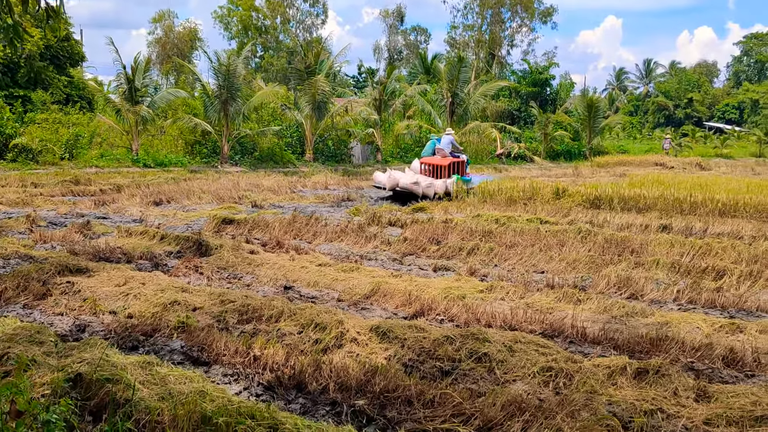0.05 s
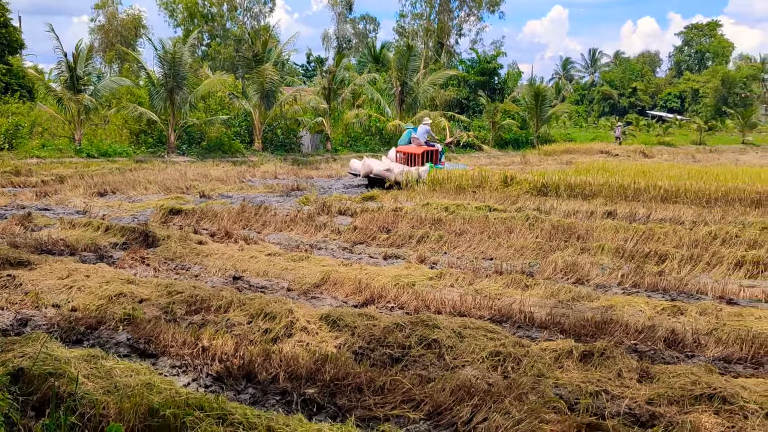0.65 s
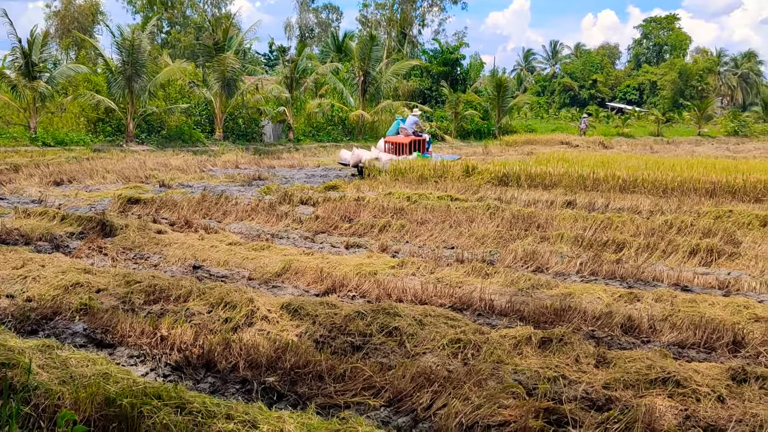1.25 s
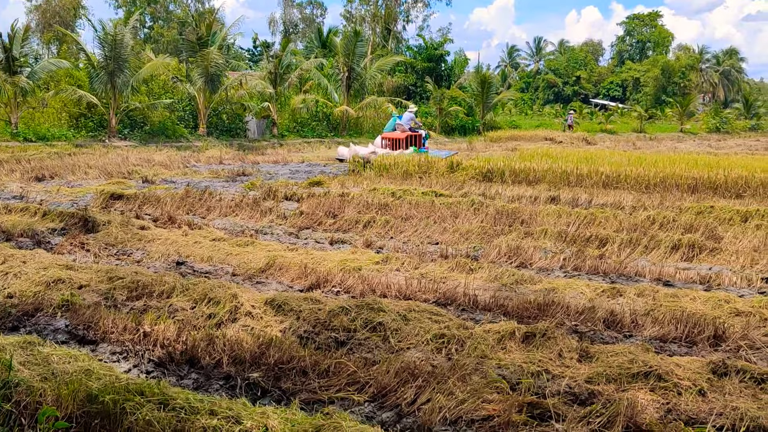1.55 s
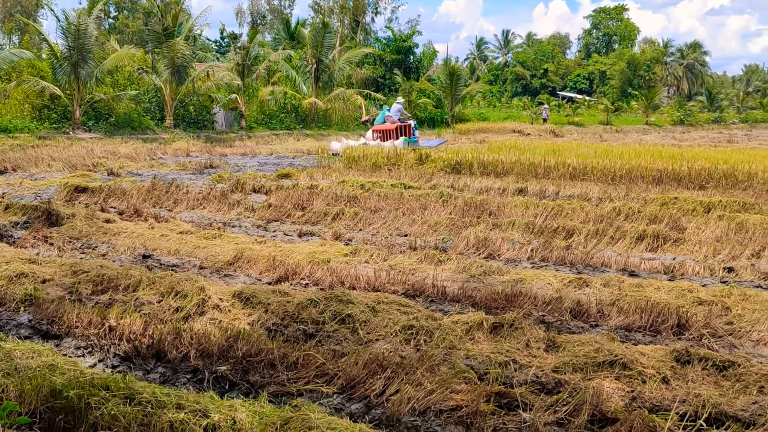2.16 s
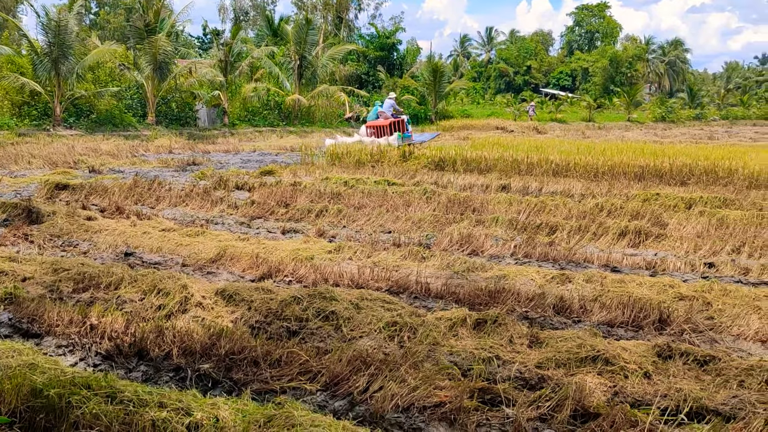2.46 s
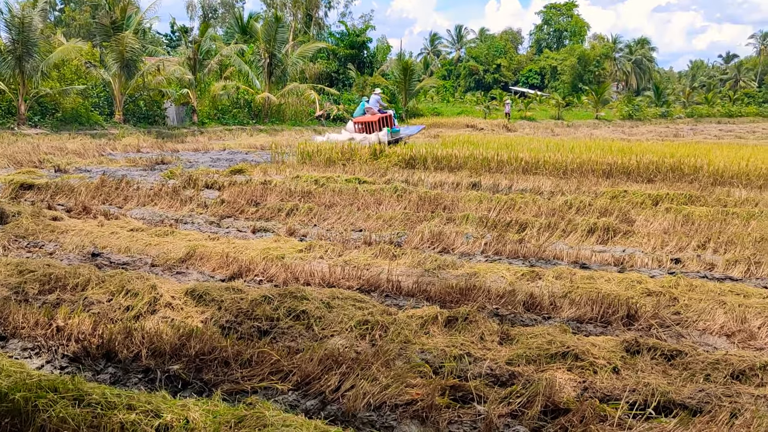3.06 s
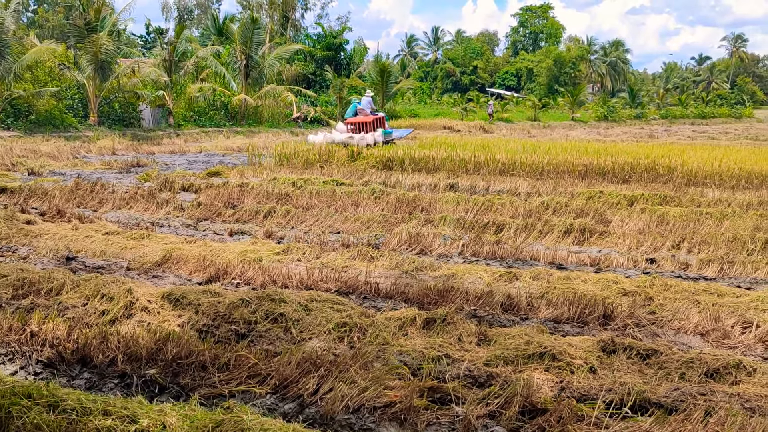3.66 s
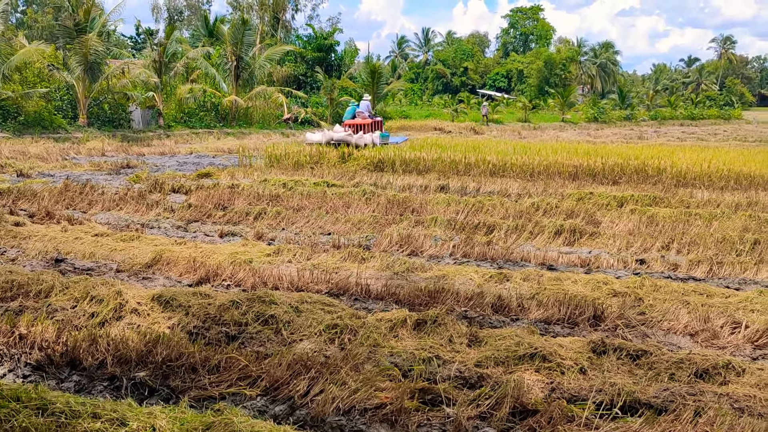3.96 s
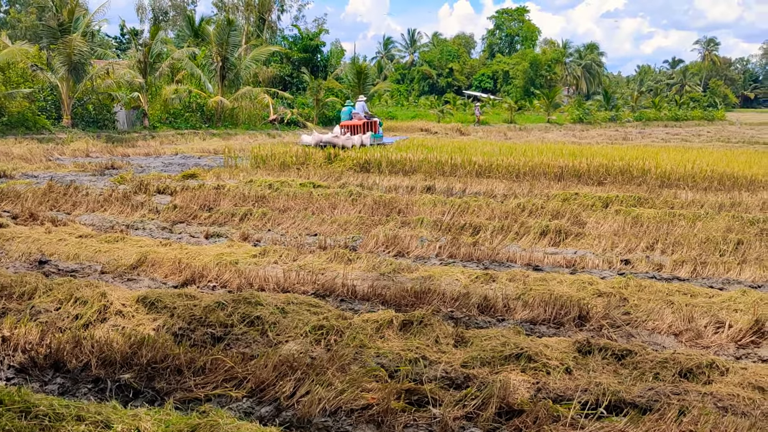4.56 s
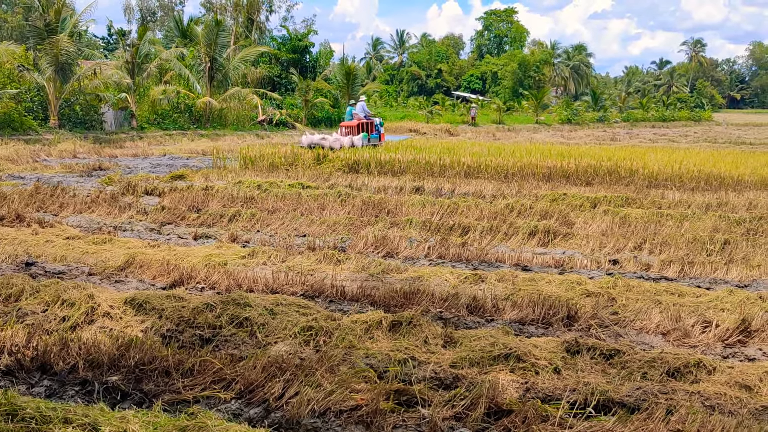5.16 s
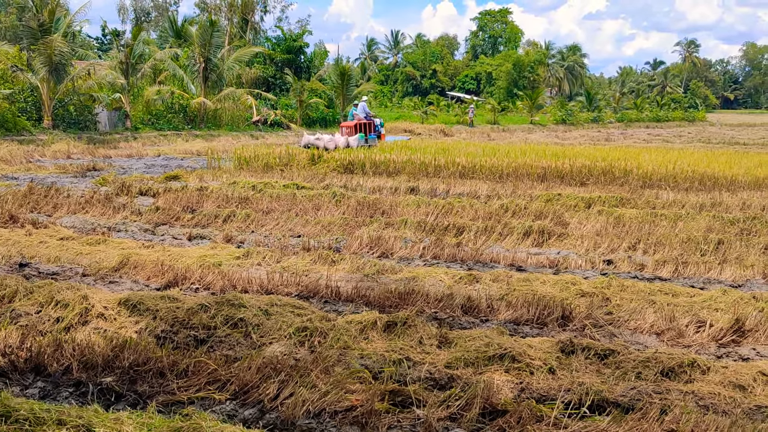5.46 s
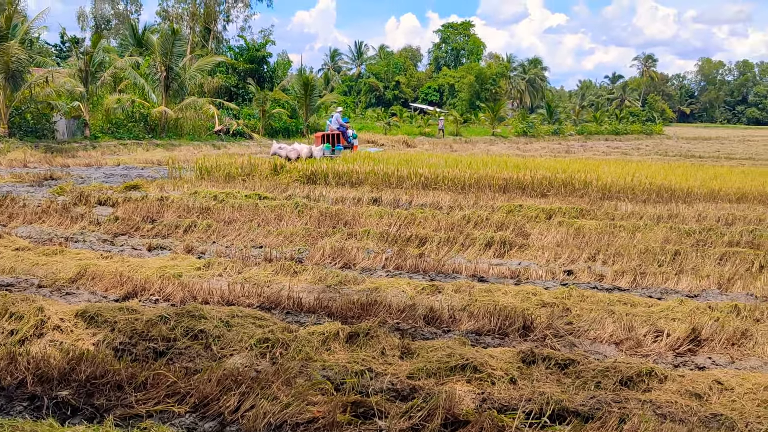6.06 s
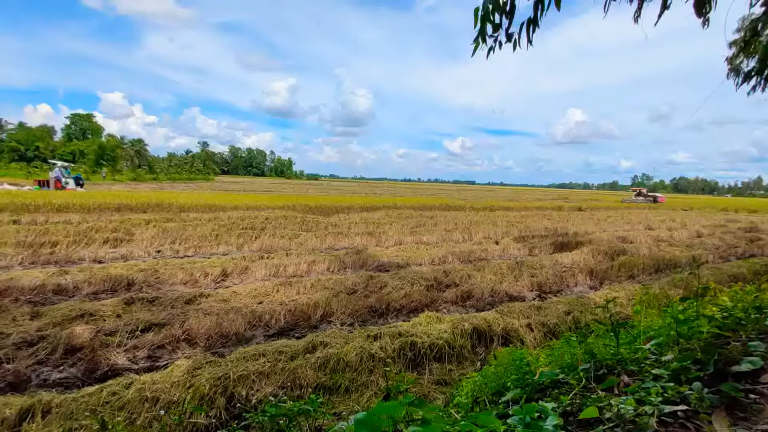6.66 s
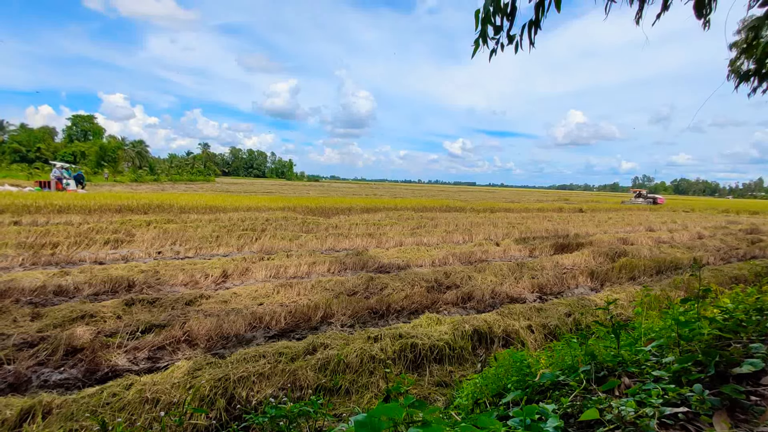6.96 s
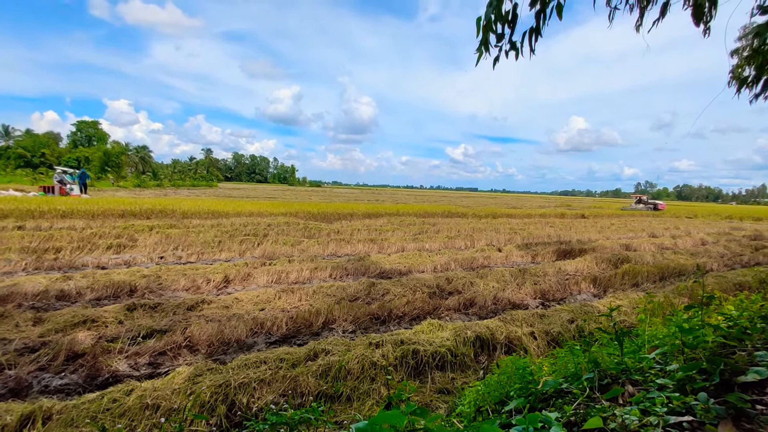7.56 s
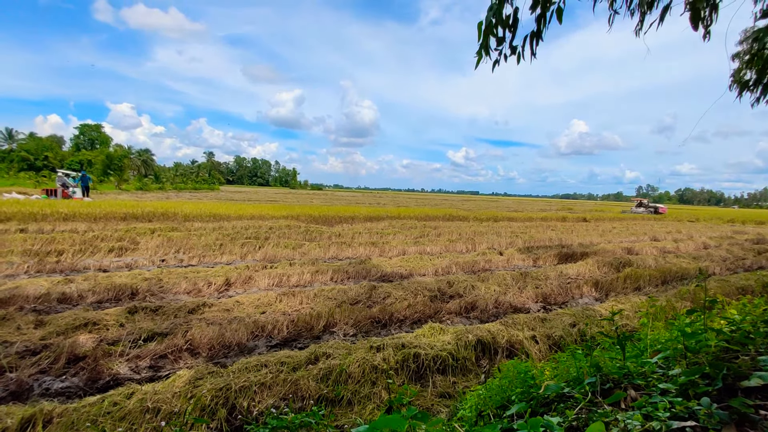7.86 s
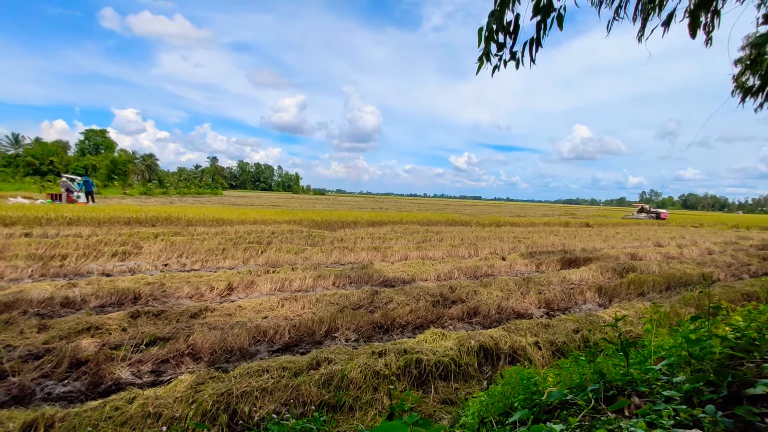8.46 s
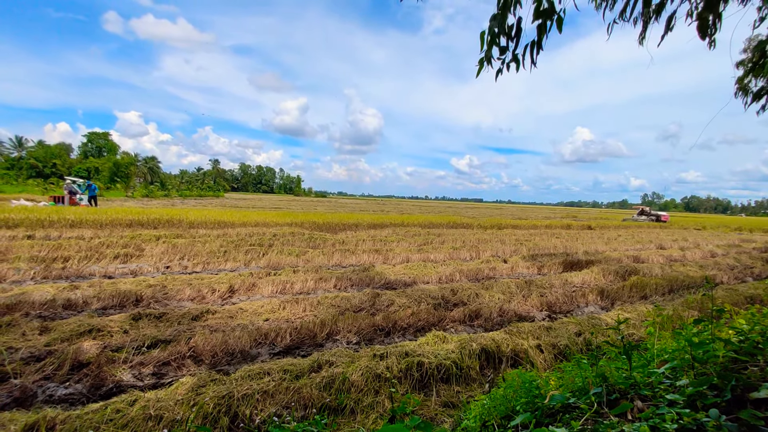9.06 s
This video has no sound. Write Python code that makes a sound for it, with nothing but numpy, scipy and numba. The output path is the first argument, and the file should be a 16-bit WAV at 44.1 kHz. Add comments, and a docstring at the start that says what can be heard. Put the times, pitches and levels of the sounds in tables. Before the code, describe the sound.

A small harvester engine runs hard near a stereo microphone in an open field, its exhaust rasping and barking above a low rumble and rushing threshing machinery. It rises slightly in pitch, then bogs down gradually, with a few harder cracks. About two thirds through, it is suddenly replaced by the softer drone of distant harvesters, with light fluttering clatter and a thin whine that swells and fades.

```python
"""A muddy rice field, on a two-port stereo microphone. First, close by, a small three-cylinder harvester
labours through the crop: every firing barks and rasps out of its open exhaust, over the rush of the
threshing gear. From about 2 s the engine sags in speed as crop and mud load it. At 6.4 s the scene
changes at once to harvesters far across the field: a low drone with wavering machine whines."""
import sys
import numpy as np
from scipy import signal
from scipy.fft import rfft, irfft, next_fast_len
from scipy.io import wavfile
from numba import njit

SR = 44100
rng = np.random.default_rng(int(sys.argv[2]) if len(sys.argv) > 2 else 0)


def dump_mix(stems):
    """Bounce the given channels to the path in sys.argv[1] as a 16-bit WAV at rate SR."""
    frames = np.atleast_2d(stems).T  # one column per channel
    limited = np.clip(frames, -1, 1)  # hard clip at full scale
    pcm = np.round(limited * 32767).astype(np.int16)
    wavfile.write(sys.argv[1], SR, pcm)


N = 410571
TIME = np.arange(N) / SR
DIRECT = np.array([[1], [0], [0]])  # of the three paths to the microphone, the direct one only
SIDES = np.array([[.5], [-.5]])  # splits a left-right difference between the ports

# the three cylinders in firing order: bark/dB, rasp/dB
CYLINDERS = [(1.6, -2.14), (-3, -4.1), (-4.5, -4.7)]
# the close machine at the two ports: f/Hz, likeness/0-1, left lead/rad, left minus right/dB
NEAR_IMAGE = [(100, .93, .3, 0), (270, .88, .15, -.7), (500, .83, .3, 0), (900, .82, .7, .5),
              (1400, .72, 1.6, 2), (2100, .45, 1.3, 6), (2800, .6, -.8, 6.5), (4000, .74, .3, .8),
              (6000, .62, .8, -2), (8000, .5, 1.65, -1), (12000, .42, 2.15, 1.1)]
# the machines across the field at the two ports: same columns
FAR_IMAGE = [(100, .99, -.08, .3), (280, .97, -.3, .3), (650, .78, -.55, 0), (900, .5, -.9, .5),
             (1220, .92, -2.1, 5), (1700, .9, -2.4, -3), (2500, .65, -5.6, 0), (3500, .55, -7.2, -1),
             (6000, .45, -12.8, -3), (12000, .4, -26, -2)]


def from_db(db):
    """Decibels to gain."""
    return 10 ** (np.asarray(db) / 20)


def rms_one(x):
    """Scale to unit power."""
    return x / np.sqrt(np.mean(x ** 2) + 1e-20)


def in_time(rows):
    """The columns of a curve at every sample."""
    times, *columns = np.transpose(rows)
    return [np.interp(TIME, times, column) for column in columns]


def noise():
    """White noise for the three paths."""
    return rng.standard_normal((3, N))


def drift(hz, hop=40):
    """Slow random wander of spread 1."""
    r = np.exp(-2 * np.pi * hop * hz / SR)
    slow = signal.lfilter([1], [1, -2 * r, r * r], rng.standard_normal(N // hop + 2002))[2000:]
    return np.interp(np.arange(N) / hop, np.arange(len(slow)), rms_one(slow))


def resonate(x, hz, width):
    """One resonance with gain 1 at its peak."""
    r = np.exp(-np.pi * width / SR)
    poles = [1, -2 * r * np.cos(2 * np.pi * hz / SR), r * r]
    return signal.lfilter(np.array([1, 0, -1]) * (1 - r * r) / 2, poles, x + 1e-18)


@njit
def moving_resonance(x, hz, width):
    """A resonance with gain 1 at its peak, whose centre can move."""
    out = np.zeros_like(x)
    r = np.exp(-np.pi * width / SR)
    for i in range(2, x.shape[1]):
        feedback = 2 * r * np.cos(2 * np.pi * hz[i] / SR)
        for c in range(x.shape[0]):
            drive = (1 - r * r) / 2 * (x[c, i] - x[c, i - 2])
            out[c, i] = drive + feedback * out[c, i - 1] - r * r * out[c, i - 2]
    return out


def lift_band(x, hz, width_hz, boost):
    """Lift the band around hz, keeping the total power."""
    lifted = x + boost * moving_resonance(x, hz, float(width_hz))
    return lifted * np.std(x) / np.std(lifted)


def at_ports(paths, image, colour=None):
    """One direct and two scattered paths reach the microphone; given a colour, at unit power."""
    size = 2 * next_fast_len(N // 2 + 4096)
    log_hz = np.log(np.arange(size // 2 + 1) * SR / size + 1)
    hz, *columns = np.transpose(image)
    alike, lead, balance_db = [np.interp(log_hz, np.log(hz), column) for column in columns]
    spectra = rfft(paths, size)
    direct = np.sqrt(alike) * np.exp(1j * lead * SIDES) * spectra[0]
    scattered = np.sqrt(1 - alike) * spectra[1:]
    mid_power = np.maximum((1 + alike * np.cos(lead)) / 2, .3)
    pair = (direct + scattered) * from_db(balance_db * SIDES) / np.sqrt(mid_power)
    if colour is None:
        return irfft(pair, size)[:, :N]
    hz, level_db = np.transpose(colour)
    cepstrum = irfft(np.log(from_db(np.interp(log_hz, np.log(hz), level_db))))
    causal_filter = np.exp(rfft(2 * cepstrum[:size // 2], size))
    out = irfft(pair * causal_filter, size)[:, :N]
    return out / np.std(out.mean(axis=0))


def far_drone():
    """Across the field, distance smears the firings into a drone, with fluttering clatter and hiss."""
    # colours of the three layers: f/Hz, relative level/dB
    drone_colour = [(18, -54), (30, -36), (59, -13), (63, -21), (75, -5), (134, -3), (156, -2), (189, -2),
                    (268, -10), (375, -31.5), (400, -53), (520, -60), (880, -120)]
    clatter_colour = [(220, -55), (380, -27), (430, -16), (560, -9.5), (690, -13), (800, -11), (980, -15.5),
                      (1200, -13), (1540, -16.5), (1670, -12), (2010, -13.5), (2700, -13), (3700, -16),
                      (4500, -20), (5850, -60), (9900, -110)]
    hiss_colour = [(2470, 1), (4200, -7), (4960, 0), (6030, 1), (6480, -4), (6930, -2.5), (8010, -5),
                   (10400, -14.5), (13400, -13), (15100, -17), (15900, -28)]
    # their course: t/s, drone/dB, clatter/dB, hiss/dB
    levels = [(6.42, -26.5, -36.5, -45.5), (7.5, -28, -36.5, -45), (8.5, -28, -37, -46),
              (9.31, -29, -37, -46.5)]
    drone_db, clatter_db, hiss_db = in_time(levels)
    drone = from_db(drone_db) * at_ports(noise(), FAR_IMAGE, drone_colour)
    clatter = from_db(clatter_db - .5 + drift(50)) * at_ports(noise(), FAR_IMAGE, clatter_colour)
    hiss = from_db(hiss_db + .8 + 1.1 * drift(40)) * at_ports(noise(), FAR_IMAGE, hiss_colour)
    return drone + clatter + hiss


def far_whines(flutter_db=1.5, partner_ratio=1.4, partner_db=-11):
    """A distant whine, its higher partner and fainter tones waver in the moving air."""
    # the main whine: t/s, f/Hz, level/dB
    main_whine = [(6.4, 1240, -48), (6.92, 1240, -52), (7.08, 1231, -39.5), (7.8, 1227, -39.5),
                  (8.3, 1224, -45), (9.31, 1220, -37.5)]
    # narrow bands of noise: f/Hz, nominal width/Hz, level/dB
    faint_tones = [(91, 7.2, -39), (130.1, 3.9, -37.5), (734, 2.8, -50.5), (786, 20, -53.5),
                   (1095, 11, -47), (1155, 46, -48.5), (1310, 22, -56), (1386, 11, -49), (1712, 29, -49),
                   (2355, 38, -49), (2546, 50, -47), (3018, 55, -44), (5940, 200, -53)]
    whine_hz, whine_db = in_time(main_whine)
    phase = 2 * np.pi * np.cumsum(whine_hz + 4.52 * drift(12)) / SR
    whine_gain = np.sqrt(2) * from_db(whine_db + flutter_db * drift(4.3))
    whine = whine_gain * np.cos([phase, phase + 3 * drift(3.5), phase + 3 * drift(8.3)])
    partner_gain = np.sqrt(2) * from_db(whine_db + partner_db + flutter_db * drift(6))
    partner = partner_gain * np.cos(partner_ratio * phase + 1.7 * drift(15))
    white, tones = noise(), 0
    for hz, width, db in faint_tones:
        band = resonate(resonate(white, hz, 1.9 * width), hz, 1.9 * width)
        tones += from_db(db + drift(20)) * rms_one(band)
    return at_ports(whine + partner + tones, FAR_IMAGE)


def thresher_and_rumble(rumble_db):
    """The threshing gear rushes steadily over a low rumble of machinery."""
    # their colours: f/Hz, relative level/dB
    rush_colour = [(220, -51), (380, -12.5), (451, 0), (579, -5), (646, -0.5), (804, -1), (1250, -3.5),
                   (1600, -6.5), (1730, -3), (2120, -5.5), (3600, -5), (5320, -13), (6940, -20.5),
                   (14200, -37.5), (15900, -61)]
    rumble_colour = [(25, -14), (50, -24), (85, -2.5), (140, 3), (220, -1.5), (305, -8.5), (375, -23),
                     (600, -43.5)]
    rush = from_db(-29.5 + .85 * drift(11)) * at_ports(noise(), NEAR_IMAGE, rush_colour)
    return rush + from_db(rumble_db) * at_ports(noise(), NEAR_IMAGE, rumble_colour)


def gear_whine(turns, multiple=16):
    """A gear locked to the crankshaft whines at a multiple of the firing rate."""
    # the whine's course: t/s, level/dB
    levels = [(0, -37), (.7, -33), (1.5, -32), (1.9, -27), (2.35, -33.5), (2.55, -45), (3.6, -43),
              (6.36, -52)]
    gear_db, = in_time(levels)
    gain = np.sqrt(2) * from_db(gear_db + 1.3 * drift(12))
    return gain * np.cos(2 * np.pi * multiple * turns + 1.22 * drift(16.7))


def engine_lope(turns, lope_db):
    """Unequal cylinders add tones between the multiples of the firing rate."""
    # those tones: multiple of the cycle rate, relative level/dB
    tones = [(2, -15), (4, -3), (5, 0), (8, -3)]
    phase = 2 * np.pi * turns / len(CYLINDERS)
    return np.sqrt(2) * sum(from_db(lope_db + db + .91 * drift(7.7)) * np.cos(k * phase) for k, db in tones)


def exhaust_note(turns, rate, crest_turns=.072, wobble_db=-.4):
    """Low harmonics crest together just after the valve opens; each swells near a muffler resonance."""
    # the exhaust pulse: harmonic, relative level/dB
    pulse = [(1, -2.5), (2, 0), (3, -0.5), (4, -15), (5, -13.5), (6, -19)]
    # the muffler's resonances: f/Hz, half width/Hz, level/dB
    muffler = [(51.3, 8, -34), (68, 8.2, -29.5), (99.4, 5.5, -16), (109.5, 7.7, -11.5), (136, 10.8, -18.5),
               (145.5, 3.3, -35), (171.8, 3.8, -25.5), (205.2, 13.5, -16), (228.4, 4.9, -8),
               (274.6, 13, -17), (294, 13, -21.5), (328.5, 18, -26.5)]
    # one harmonic dips briefly: t/s, half length/s, harmonic, dip/dB
    dips = [(1.99, .13, 2, -28), (2.34, .12, 2, -15), (1.745, 0.49, 3, -7.5), (3, 0.038, 3, -3),
            (1.6, .35, 5, -12), (5.43, 0.35, 5, -16)]
    note = 0
    for k, pulse_db in pulse:
        power = sum((from_db(db) / (1 + ((k * rate - hz) / width) ** 2)) ** 2 for hz, width, db in muffler)
        dip_db = sum(db * np.exp(-((TIME - t) / span) ** 2) for t, span, which, db in dips if which == k)
        gain = np.sqrt(2 * power) * from_db(pulse_db + dip_db + wobble_db * drift(12))
        note += gain * np.cos(2 * np.pi * k * (turns - crest_turns))
    return note


def pipe_boom(turns, rate, width_hz=56):
    """Harmonics 6 to 10 swell as they pass through the pipe's resonance; unit power."""
    # the resonance rises as the gas runs hotter: firing rate/Hz, f/Hz
    resonance = [(50, 426), (55, 453), (68, 490)]
    pipe_hz = np.interp(rate, *np.transpose(resonance))
    harmonics = np.arange(6, 11)[:, None]
    gains = 1 / (1 + ((harmonics * rate - pipe_hz) / width_hz) ** 2)
    boom = np.sum(gains * np.cos(2 * np.pi * harmonics * turns), axis=0)
    return boom / np.sqrt(np.sum(gains ** 2, axis=0) / 2)


def ringing(strikes, firing, modes, spread_db, wander_db, flip_share=.3):
    """Each firing strikes each mode with its own strength; modes fade in and out as the machine rocks."""
    strike_db = spread_db * np.clip(rng.standard_normal((firing[-1] + 1, len(modes))), -2, 1.5)
    signs = np.where(rng.random(strike_db.shape) < flip_share, -1, 1) * (-1) ** np.arange(len(modes))
    strength = signs * from_db(strike_db)
    ring = 0
    for k, (hz, width, db) in enumerate(modes):
        drive = strikes * strength[firing, k] * from_db(wander_db * drift(3.2))
        ring += from_db(db) * rms_one(resonate(drive, hz, width))
    return ring


def guard_clang(strikes, firing):
    """The firings set the sheet-metal guards ringing, loudest at the start."""
    # the guards' modes: f/Hz, width/Hz, relative level/dB
    modes = [(1145, 64, -14.5), (1325, 21, -7.5), (1394, 10.6, -5.5)]
    # the clang's course: t/s, level/dB
    levels = [(0, -28.5), (1.25, -32.5), (1.8, -39), (3.4, -32.5), (4.4, -39), (5.7, -53)]
    clang_db, = in_time(levels)
    return from_db(clang_db) * ringing(strikes, firing, modes, spread_db=1, wander_db=-1.5)


def puffs(age, rise_s, decay_s, tail, tail_s):
    """Turbulent gas: each puff opens fast and dies away, followed by a weaker scattered tail."""
    power = np.exp(-2 * age / decay_s) + tail ** 2 * np.exp(-2 * age / tail_s)
    return noise() * (1 - np.exp(-age / rise_s)) * np.sqrt(power)


def jet_pitch(firing, spread=.13):
    """Each jet of gas sings briefly at a pitch of its own: one random ratio a firing."""
    return np.exp(spread * rng.standard_normal(firing[-1] + 1))[firing]


def exhaust_sizzle(clicks, firing, age, gain):
    """The shortest puffs hiss at the top of the range, and the stack's highest modes ring."""
    # the hiss: f/Hz, relative level/dB
    colour = [(2880, -26), (4900, -6), (5250, -3), (5820, -1), (6420, -4), (7820, -7.5), (8550, -14),
              (10800, -21), (15100, -24), (15900, -22)]
    # the stack's highest modes: f/Hz, width/Hz, relative level/dB
    modes = [(5150, 80, -22), (5710, 36, -10), (5860, 270, -17.5), (7530, 110, -26)]
    jet = gain ** 1.12 * puffs(age, rise_s=.00045, decay_s=.0014, tail=.28, tail_s=.014)
    sizzle = from_db(-2.5) * at_ports(jet, NEAR_IMAGE, colour)
    sizzle = lift_band(sizzle, 5900 * jet_pitch(firing), width_hz=260, boost=1.3)
    return sizzle + ringing(clicks * gain, firing, modes, spread_db=4, wander_db=4)


def exhaust_rasp(clicks, firing, age, gain, rate, edge_share=.23):
    """A sharp edge and a jet of gas rasp out of the ringing stack, higher at higher engine speed."""
    # the jet: f/Hz, relative level/dB
    colour = [(880, -36.5), (1500, -1.5), (1660, -15), (1840, -2.5), (2230, -11), (2630, -8.5), (2860, 2.5),
              (3320, 0.5), (3690, 2.5), (4090, 2), (4360, 0), (4690, 2.5), (5200, -5.5), (6760, -44),
              (11400, -120)]
    # the stack's modes: f/Hz, width/Hz, relative level/dB
    modes = [(1880, 29, -24), (2440, 22, -20), (2812, 17, -17.5), (3100, 40, -43), (3400, 28, -27),
             (3660, 23, -17), (4030, 42, -14.5), (4260, 44, -18), (4540, 82, -20)]
    jet = rms_one(gain * puffs(age, rise_s=.00018, decay_s=.0028, tail=.35, tail_s=.015))
    edge = edge_share * DIRECT * rms_one(clicks * gain)
    rasp = from_db(-2) * at_ports(jet + edge, NEAR_IMAGE, colour)
    centre_hz = 3670 + 37 * (rate - 60)
    rasp = lift_band(rasp, centre_hz * jet_pitch(firing), width_hz=240, boost=1.3)
    return rasp + ringing(clicks * gain, firing, modes, spread_db=5.5, wander_db=4)


def exhaust_bark(clicks, age, gain, step_share=1.37, centre_hz=834.0):
    """A pressure step and a puff leave the pipe; the step repeats each firing, so the bark is pitched."""
    # the bark: f/Hz, relative level/dB
    colour = [(340, -44.5), (580, -16), (715, -0.5), (829, 0), (995, -1.5), (1080, 0), (1170, -11),
              (1250, 0.5), (1620, -26.5), (2750, -120)]
    step = step_share * DIRECT * rms_one(clicks * gain)
    gas = rms_one(gain * puffs(age, rise_s=.0003, decay_s=.0068, tail=.45, tail_s=.013))
    bark = at_ports(step + gas, NEAR_IMAGE, colour)
    return lift_band(bark, np.full(N, centre_hz), width_hz=88, boost=.37)


def firing_force(firing, uneven_db=1.0):
    """Strength of every firing in dB: a little chance, and runs of harder firings."""
    # one cylinder fires harder: t/s, cycles running, level/dB
    cracks = [(.222, 1, 1), (.564, 1, 0.5), (1.405, 1, 0.5), (2.372, 1, 1), (2.795, 1, 3.5), (2.863, 5, 2),
              (3.280, 4, 1), (3.636, 1, 3), (3.708, 3, 2.5), (4.249, 1, 5), (4.394, 1, 5), (4.687, 3, 1),
              (5.243, 1, 1)]
    force_db = uneven_db * rng.standard_normal(firing[-1] + 1)
    for t, cycles, db in cracks:
        first = firing[int((t + .005) * SR)]
        force_db[first + len(CYLINDERS) * np.arange(cycles)] = db
    return force_db


def above_rush(level_db, rush_db):
    """Gain of a blast that sinks away as it nears the level of the machine's rush."""
    return from_db(level_db) * np.sqrt(np.clip(1 - from_db(2 * (rush_db - level_db)), .1, 1))


def exhaust_blasts(turns, rate, turn_away_s=1):
    """Every firing barks, rasps, sizzles and booms through the open pipe and shakes the guards."""
    # strength of the blasts: t/s, rasp/dB, bark/dB
    levels = [(0, -19.5, -29), (0.55, -19, -27.5), (1.0, -19, -25.5), (1.8, -21, -25), (2.3, -21.5, -27),
              (2.6, -25.5, -29), (2.85, -22.5, -27), (3.2, -24, -28.5), (3.85, -26, -31.5),
              (4.2, -30, -35.0), (4.5, -25, -31), (5.15, -25.5, -29), (5.4, -29, -31.5),
              (5.65, -37.5, -36.2), (6.36, -34.5, -34)]
    rasp_db, bark_db = in_time(levels)
    effort_db = rasp_db + 25  # against a middling blast
    # boom and sizzle follow the rasp, and fall off as the machine turns from the microphone
    facing = np.exp(-(TIME / turn_away_s) ** 2)
    boom_db = -42 + .8 * effort_db + 5.5 * facing
    sizzle_db = -33.5 + .94 * effort_db + 6.5 * facing
    firing = turns.astype(int)
    age = turns % 1 / rate  # seconds since the last firing
    clicks = np.diff(firing, prepend=0).astype(float)
    cylinder_db = np.array(CYLINDERS)[firing % len(CYLINDERS)].T
    bark_gain, rasp_gain = from_db(cylinder_db + firing_force(firing)[firing])
    bark = from_db(-1.34) * above_rush(bark_db, rush_db=-35) * exhaust_bark(clicks, age, bark_gain)
    clang = guard_clang(clicks * bark_gain, firing)
    rasp = above_rush(rasp_db, rush_db=-37) * exhaust_rasp(clicks, firing, age, rasp_gain, rate)
    sizzle = above_rush(sizzle_db, rush_db=-42.5) * exhaust_sizzle(clicks, firing, age, rasp_gain)
    boom = from_db(boom_db + 1.3 * drift(15)) * pipe_boom(turns, rate)
    return bark + clang + rasp + sizzle + boom


def near_harvester():
    """The machine close to the microphone: one engine speed drives its exhaust and gear whine."""
    # the engine sags under crop and mud: t/s, firing rate/Hz
    speed = [(0.0, 66.61), (0.76, 68.21), (1.19, 69.58), (1.72, 69.59), (2.25, 66.67), (2.46, 63.59),
             (2.73, 59.23), (2.88, 57.95), (3.38, 56.89), (3.74, 54.63), (3.99, 56.0), (4.81, 53.93),
             (5.14, 53.82), (5.42, 53.18), (5.82, 49.53), (6.36, 49.39)]
    # the low end: t/s, lope/dB, rumble/dB, left minus right of the note/dB
    low_end = [(0, -33, -27, 0), (1.2, -29.5, -25.5, -0.6), (2.2, -33, -27.5, 0.3), (3, -38, -25, -0.7),
               (5, -36, -29, -1.3), (6.36, -41, -26.5, -1.3)]
    rate, = in_time(speed)
    turns = np.cumsum(rate) / SR + .145  # one turn of phase a firing
    lope_db, rumble_db, pan_db = in_time(low_end)
    note = (engine_lope(turns, lope_db) + exhaust_note(turns, rate)) * from_db(pan_db * SIDES)
    return note + gear_whine(turns) + thresher_and_rumble(rumble_db) + exhaust_blasts(turns, rate)


def scene(change_s=6.372):
    """The close machine gives way abruptly to those across the field."""
    return np.where(TIME < change_s, near_harvester(), far_drone() + far_whines())


def record(dry, ceiling=.96, cutoff_hz=15900):
    """The tallest peaks are rounded off and the top treble is cut."""
    top_cut = signal.ellip(12, .1, 80, cutoff_hz, fs=SR, output="sos")
    rounded = dry / (1 + (dry / ceiling) ** 12) ** (1 / 12)
    return signal.sosfilt(top_cut, rounded)


dry = scene()
out = record(dry)
dump_mix(out)
```